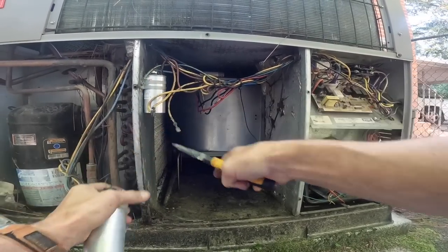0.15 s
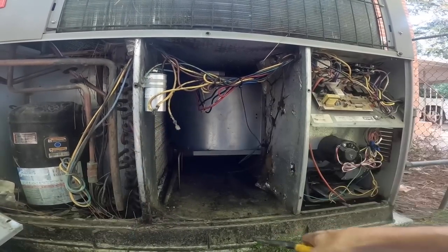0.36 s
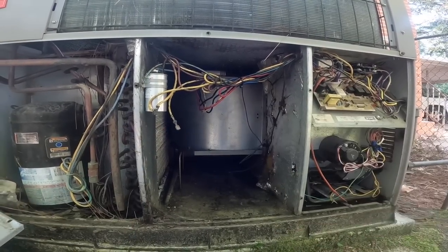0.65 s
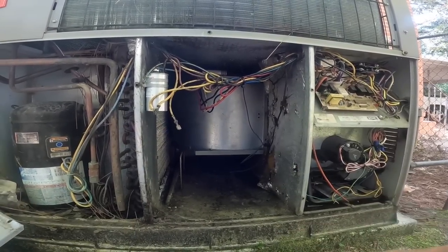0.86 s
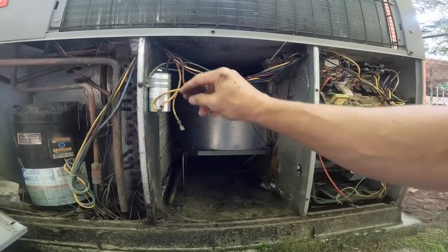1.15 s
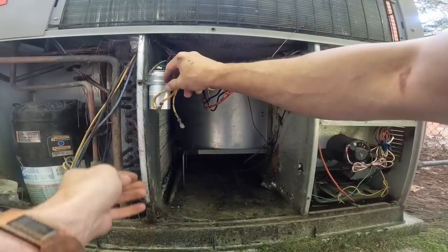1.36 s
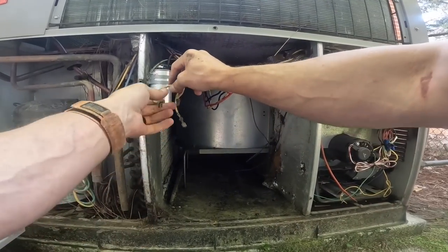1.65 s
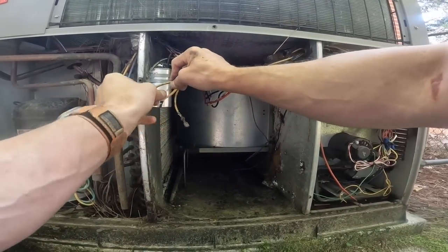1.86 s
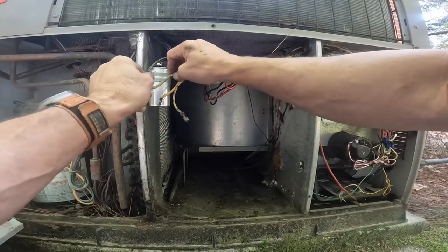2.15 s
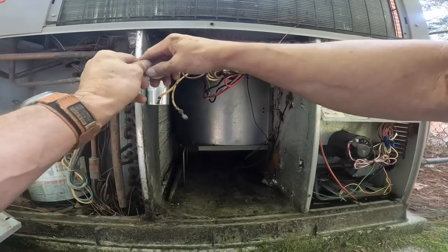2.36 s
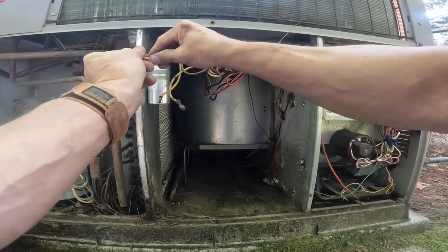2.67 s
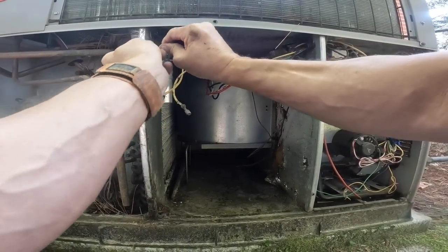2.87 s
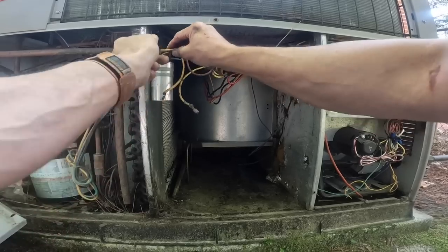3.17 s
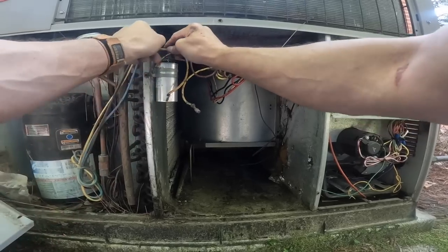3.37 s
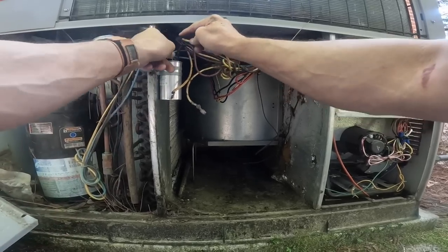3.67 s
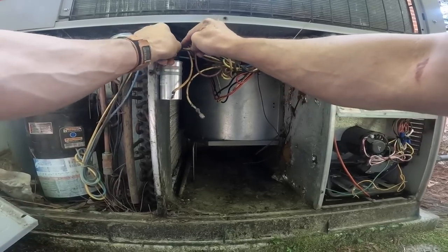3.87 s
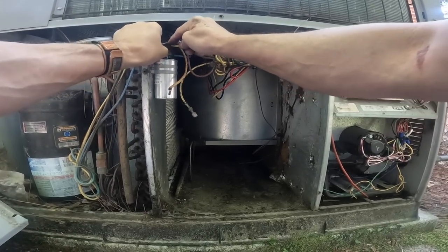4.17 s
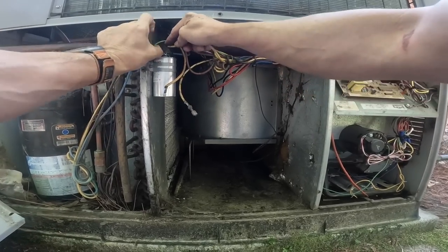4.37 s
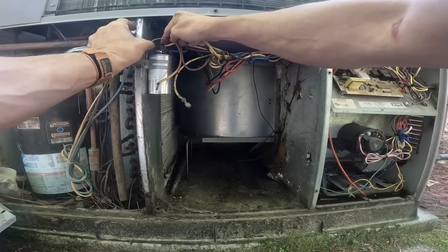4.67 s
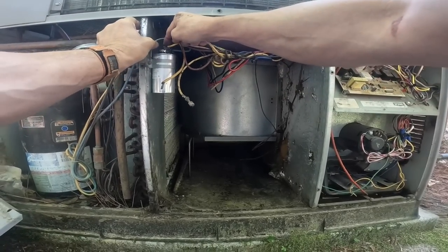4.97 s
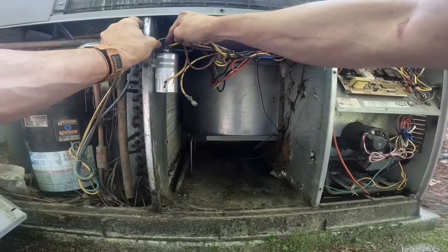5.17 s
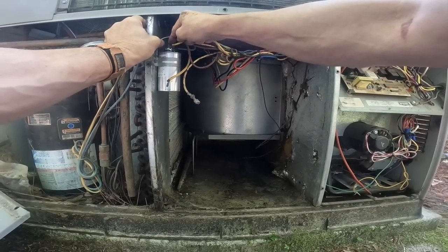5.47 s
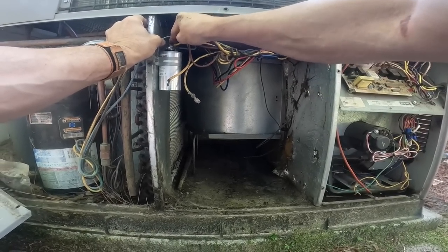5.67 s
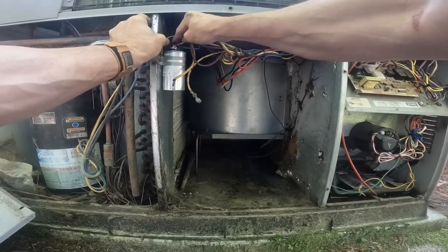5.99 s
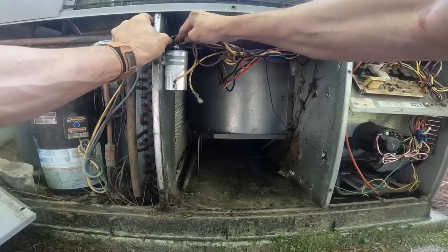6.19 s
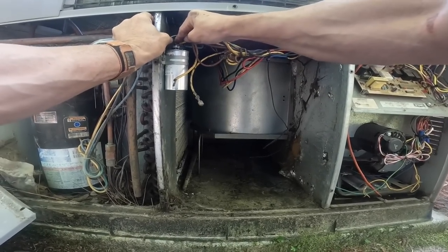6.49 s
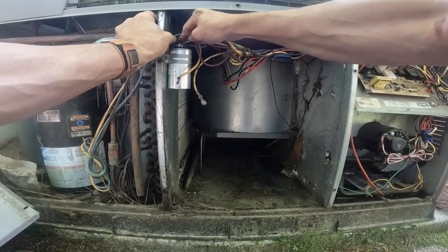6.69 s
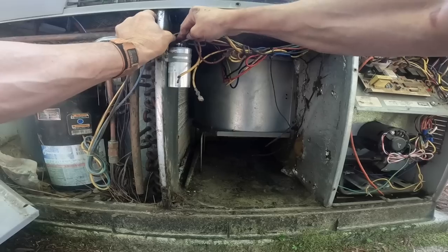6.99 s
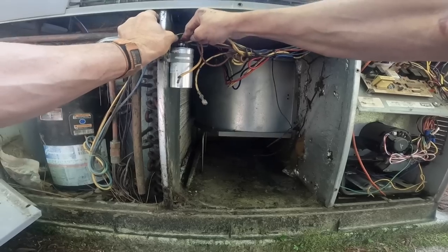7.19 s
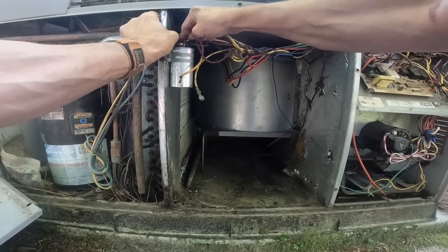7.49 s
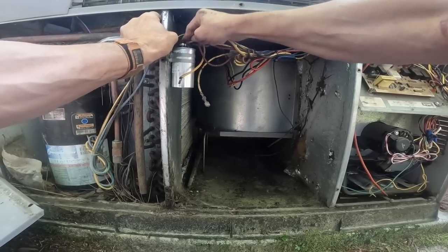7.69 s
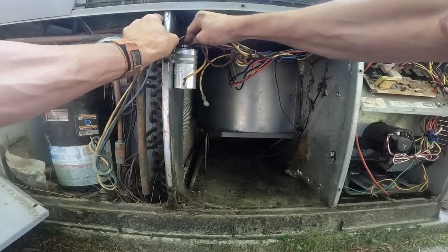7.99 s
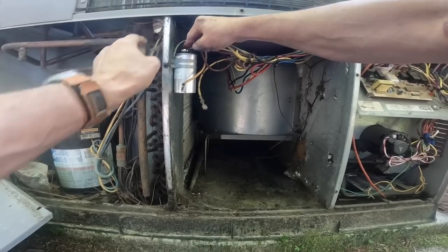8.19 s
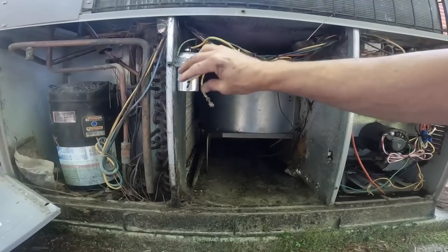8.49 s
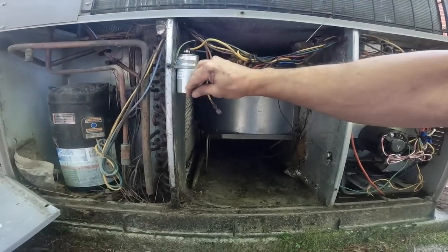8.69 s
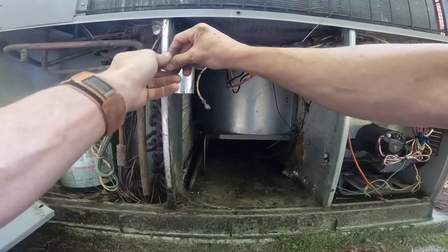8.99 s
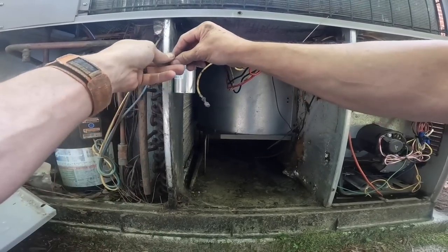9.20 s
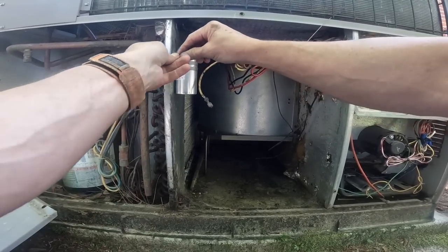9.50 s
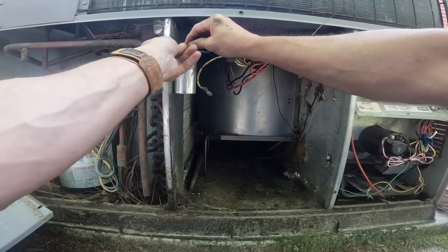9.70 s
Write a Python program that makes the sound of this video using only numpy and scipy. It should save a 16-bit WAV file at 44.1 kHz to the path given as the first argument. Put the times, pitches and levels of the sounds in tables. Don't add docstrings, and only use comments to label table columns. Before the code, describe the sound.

Outdoors at arm's length, hands rustle loose wires with light ticks. Pliers drop early with a hard clank, bounce and thud. Later a metal connector touches a tab, scrapes on quickly, then creaks and clicks in tiny slips while the thin can pings. A neighbouring motor hums, wind bumps the microphone, and birds whistle in far trees.

```python
import sys
import numpy as np
from scipy import signal
from scipy.fft import rfft, irfft, next_fast_len
from scipy.io import wavfile
from scipy.ndimage import uniform_filter1d

SR = 44100
rng = np.random.default_rng(int(sys.argv[2]) if len(sys.argv) > 2 else 0)


def wav_out(sig):
    wavfile.write(sys.argv[1], SR, np.round(np.clip(np.atleast_2d(sig).T, -1, 1) * 32767).astype(np.int16))


def attenuation_scalar(level_db):
    decades = np.asarray(level_db, float) / 20
    return 10 ** decades


N = 434385


def evened(x):
    return x / np.sqrt(np.mean(x ** 2) + 1e-20)


def read(points, hz):
    f, value = np.transpose(points)
    return np.interp(np.log(hz + 1), np.log(f + 1), value)


def curves(rows):
    s, *columns = np.transpose(rows)
    return [np.interp(np.arange(N) / SR, s, column) for column in columns]


def swells(rows, rest_db, rise_db_per_s, fall_db_per_s):
    t = np.arange(0, N, 64) / SR
    s, length, db = np.transpose(rows)[:, :, None]
    rise = rise_db_per_s * np.maximum(s - t, 0)
    fall = fall_db_per_s * np.maximum(t - s - length, 0)
    power = attenuation_scalar(2 * (db - rise - fall)).sum(0)
    return 10 * np.log10(np.interp(np.arange(N) / SR, t, power) + attenuation_scalar(2 * rest_db))


def add(mix, s, sound):
    part = mix[round(s * SR):][:len(sound)]
    part += sound[:len(part)]


def peaked(x, db):
    return attenuation_scalar(db) * x / abs(x).max()


def band(x, hz, width):
    return signal.lfilter(*signal.iirpeak(hz, hz / width, SR), x)


def band_twice(x, hz, width):
    return band(band(x, hz, width), hz, width)


def body(x, modes):
    return sum((-1) ** k * attenuation_scalar(db) * band(x, hz, width) for k, (hz, width, db) in enumerate(modes))


def shaped(x, points):
    size = next_fast_len(N)
    gain = attenuation_scalar(read(points, np.fft.rfftfreq(size, 1 / SR)))
    return irfft(rfft(x, size) * gain, size)[..., :N]


def ports(x, loose):
    decay = attenuation_scalar(-60 * np.arange(900) / SR / 0.18)
    taps = rng.standard_normal((2, 900)) * (rng.random((2, 900)) < 0.05) * decay
    taps = signal.lfilter([1, -1], [1, -0.85], taps)
    taps *= loose / np.linalg.norm(taps, axis=1)[:, None]
    taps[:, 0] += 1
    return signal.oaconvolve(x[None], taps, axes=1)[:, :N]


# pitch_hz, level_db (per Hz)
YARD = [(25, -10), (50, 0), (105, 2), (200, -11.5), (310, -17), (400, -17), (630, -26.5), (800, -30.5),
        (1300, -26.5), (1700, -29.5), (2300, -39), (3800, -51.5), (6500, -47), (12000, -58.5)]
YARD_DB = -43.5
# pitch_hz, likeness (0 to 1)
LIKENESS = [(60, 1), (180, 0.99), (550, 0.89), (1650, 0.42), (4970, 0.28), (15000, 0.64)]
# pitch_hz, lead_rad
LEFT_LEAD = [(0, 0.56), (2500, -0.35), (5860, 0.1), (7410, -0.2), (8790, -0.0), (15200, -0.0)]
# pitch_hz, level_db
LEFT_TILT = [(60, 0.5), (180, -1.5), (550, 2), (1650, 3), (4970, -1), (15000, 13)]


def yard():
    frames, hz = N // 512 + 5, np.fft.rfftfreq(2048, 1 / SR)
    a, b, c, d, patches = rng.standard_normal((frames, 1025, 5)).T
    patches = evened(uniform_filter1d(uniform_filter1d(patches, 16, 0), 12, 1))
    same = np.clip(read(LIKENESS, hz), 0, 1)[:, None]
    left = a + 1j * b
    right = same * left + np.sqrt(1 - same ** 2) * (c + 1j * d)
    right *= (np.exp(-1j * read(LEFT_LEAD, hz)) / attenuation_scalar(read(LEFT_TILT, hz)))[:, None]
    spectra = np.array([left, right]) * attenuation_scalar(read(YARD, hz)[:, None] + 2.0 * patches)
    return attenuation_scalar(YARD_DB) * evened(signal.istft(spectra, nperseg=2048, noverlap=1536)[1][:, :N])


SWELL_DB_PER_S, EBB_DB_PER_S = 48, 58.5
# start_s, length_s, level_db
SURGES = [
    (.3, 0.65, -50),
    (3.5, 0.71, -46),
    (5.15, 0.19, -46.5),
    (6.6, 1.6, -46.5),
    (8.7, 0.39, -37),
    (9.45, 0.1, -32.5),
]
IDLE_DB = -62.5


def motor():
    hum_db = swells(SURGES, IDLE_DB, SWELL_DB_PER_S, EBB_DB_PER_S)
    hum = evened(band(band(rng.standard_normal(N), 118.35, 8.7), 119.7, 3.3))
    buzz = evened(band_twice(rng.standard_normal(N), 233, 4.9))
    return attenuation_scalar(hum_db - 4.5) * hum + attenuation_scalar(-57.5) * buzz


# time_s, level_db
WIND = [(0.0, -39), (0.93, -51), (1.28, -43.5), (1.54, -54), (1.8, -38.5), (2.38, -49.5), (3.18, -36.5),
        (3.5, -45), (4.62, -37.5), (5.57, -53), (6.22, -28), (6.53, -44.5), (7.4, -29), (7.72, -45),
        (8.08, -33.5), (8.67, -37), (9.3, -38), (9.85, -44)]
# start_s, length_s, level_db
GUSTS = [
    (.25, 0.42, -45),
    (3.0, 0.94, -44),
    (5.1, 0.21, -40),
    (5.95, 0.38, -45.5),
    (6.6, 0.82, -46.5),
    (8.05, 0.76, -42),
    (9.2, 0.29, -45),
]
CALM_DB = -51


def wind():
    push_db, = curves(WIND)
    roar_db = swells(GUSTS, CALM_DB, SWELL_DB_PER_S, EBB_DB_PER_S)
    n = rng.standard_normal((6, N))
    push = shaped(n[0] + 0.14 * n[1:3], [(2, -7), (6, 11.5), (14, 7.5), (25, -3.5), (40, -55.5), (120, -130)])
    roar = shaped(n[3] + 0.17 * n[4:], [(18, -49), (28, -10.5), (55, -5.5), (90, -15.5), (300, -110)])
    return attenuation_scalar(push_db) * evened(push) * attenuation_scalar([[-3.5], [2.5]]) + attenuation_scalar(roar_db) * evened(roar)


# start_s, length_s, pitch_hz, width_hz, level_db
GROANS = [
    (1.38, 0.19, 620, 170, -53),
    (8.241, 0.14, 616, 150, -52.5),
    (1.55, 0.5, 755, 51, -66),
    (2.12, 0.18, 100, 9.3, -42.5),
]


def truck():
    out = np.zeros(N)
    for s, length, hz, width, db in GROANS:
        groan = band_twice(rng.standard_normal(round(length * SR)), hz, width)
        add(out, s, attenuation_scalar(db) * evened(groan) * np.hanning(len(groan)))
    return out


OVERTONE_DB = -19


def whistle(notes, shake):
    out = np.zeros(N)
    for s, length, start_hz, end_hz, db in notes:
        hz = np.geomspace(start_hz, end_hz, round(length * SR))
        unsteady = uniform_filter1d(rng.standard_normal((2, SR // 2)), 300)
        waver, flutter = evened(unsteady)[:, :len(hz)]
        turn = 2 * np.pi * np.cumsum(hz * (1 + shake * waver)) / SR
        tone = np.sin(turn) + attenuation_scalar(OVERTONE_DB) * np.sin(2 * turn)
        add(out, s, attenuation_scalar(db + 3.76 * flutter) * tone * signal.windows.tukey(len(hz), 0.5))
    return out


# start_s (within the phrase), length_s, start_hz, end_hz, level_db
PHRASE = [
    (0, 0.0196, 2570, 2836, -60.5),
    (0.018, 0.037, 2870, 2800, -63),
    (.04, .04, 2660, 2403, -67),
    (0.105, 0.025, 5710, 3800, -64.5),
    (0.126, .045, 3350, 3100, -62.5),
    (0.168, 0.027, 3097, 4305, -60.5),
]
# start_s, level_db, high_notes_db
PHRASES = [
    (2.534, -1, 1),
    (2.862, 1, 0),
    (3.222, 1.5, 0.5),
    (3.59, -0.5, 2),
    (8.398, 0.5, -5),
    (8.757, 2, -6),
    (9.108, -2.5, -7),
]
# start_s, length_s, start_hz, end_hz, level_db
FAR_NOTES = [
    (1.1, .04, 1996, 2750, -61),
    (1.145, 0.036, 2580, 2074, -64.5),
    (2.31, 0.024, 3400, 3200, -72),
    (2.335, 0.045, 3200, 4500, -65),
    (2.46, 0.071, 5400, 4700, -73),
    (8.5, .04, 3200, 3400, -72),
    (9.254, .05, 3380, 3280, -61.5),
    (5.34, 0.069, 3700, 4340, -68.5),
    (5.9, 0.052, 3860, 2990, -59.5),
]
HIGH_HZ = 3800
WREN_SHAKE = 0.018
LEAF_BLUR_S = 0.0058


def far_wren():
    notes = list(FAR_NOTES)
    for s, more_db, high_db in PHRASES:
        for delay, length, start_hz, end_hz, db in PHRASE:
            facing_db = high_db * (max(start_hz, end_hz) > HIGH_HZ)
            notes.append((s + delay, length, start_hz, end_hz, db + more_db + facing_db))
    leaves = signal.oaconvolve(rng.standard_normal(N), np.hanning(round(LEAF_BLUR_S * SR)), "same")
    return whistle(notes, WREN_SHAKE) * evened(1.2 + evened(leaves))


# start_s, length_s, start_hz, end_hz, level_db
WHISTLES = [(0.335, 0.054, 4650, 4900, -66), (.375, .045, 4940, 4900, -59), (.375, 0.049, 6150, 6160, -72),
            (.44, .11, 2780, 2680, -67), (3.78, 0.094, 5970, 5950, -76), (3.91, 0.055, 5730, 5700, -69),
            (1.37, .08, 6750, 6750, -77), (6.71, 0.034, 4127, 4030, -71), (6.652, .04, 5150, 5240, -74),
            (.35, .035, 3580, 3660, -66), (0.37, 0.17, 3070, 3100, -69), (.76, 0.024, 4000, 4550, -65),
            (0.786, 0.034, 2980, 3090, -60), (.815, 0.028, 3270, 3030, -63), (.95, .15, 3544, 3420, -66),
            (1.285, 0.0246, 3350, 4600, -68), (1.31, 0.048, 4620, 4610, -64), (1.33, 0.03, 4310, 3790, -65),
            (5.315, 0.021, 3710, 3924, -65.5), (5.33, 0.046, 4180, 4140, -72),
            (5.39, 0.027, 4450, 4420, -67), (3.14, .09, 5030, 4970, -71), (5.857, 0.071, 3930, 3640, -57.5),
            (5.975, 0.055, 2846, 2710, -56), (9.355, 0.069, 5540, 5400, -64.5),
            (9.398, 0.062, 5350, 4500, -59), (9.44, 0.066, 4480, 4320, -61), (9.54, 0.11, 4500, 4380, -77),
            (9.4, 0.12, 3180, 3080, -64.5)]
NEAR_SHAKE = 0.009


def high_whistler():
    flicker = evened(uniform_filter1d(rng.standard_normal(N), 500))
    return whistle(WHISTLES, NEAR_SHAKE) * evened(1.9 + flicker)


# start_s, length_s, start_hz, end_hz, level_db
CHIRPS = [(.27, 0.036, 2510, 2700, -63.5), (1.48, 0.063, 2680, 2520, -67), (4.54, 0.015, 2497, 2550, -61),
          (4.557, 0.022, 2200, 2170, -66), (4.577, .025, 2150, 2110, -64.5), (4.78, 0.015, 2050, 2300, -67),
          (4.8, 0.035, 2080, 2070, -64), (4.862, 0.015, 2520, 2550, -58.5), (4.88, .045, 2150, 2090, -58),
          (5.6, 0.039, 2800, 2780, -70), (5.775, .04, 2260, 2460, -55), (5.84, .025, 2150, 2250, -64),
          (5.868, .03, 2490, 2580, -66), (9.36, .03, 2600, 2770, -69), (9.39, 0.08, 2790, 2200, -66)]


def low_chirper():
    return whistle(CHIRPS, NEAR_SHAKE)


def trees():
    wren, near, chirps = far_wren(), high_whistler() + truck(), low_chirper()
    tail = rng.standard_normal((2, SR)) * attenuation_scalar(-60 * np.arange(SR) / SR / 0.68)
    tail = tail + 0.46 * tail[::-1]
    tail = tail / np.linalg.norm(tail[0])
    sent = attenuation_scalar(2) * wren + attenuation_scalar(-1.5) * near + attenuation_scalar(-7.5) * chirps
    echoes = signal.fftconvolve(sent[None], tail, axes=1)[:, :N]
    direct = attenuation_scalar(-3) * near + chirps + attenuation_scalar(-9) * wren
    return direct * attenuation_scalar([[1.1], [-1.1]]) + echoes


# pitch_hz, level_db, t60_s
PLIERS = [(344, -7, 0.11), (592, -15, 0.031), (930, -4, 0.043), (1290, -0.5, 0.018), (1622, -7, 0.013),
          (2430, -13, 0.028), (3320, -5, 0.022), (4650, 2, 0.015), (5220, 3.5, 0.009), (5960, -16, 0.02),
          (7400, -20.5, 0.037), (9500, -17.5, .02)]
# start_s, level_db
DROP = [(.912, -48), (0.9228, -19), (0.9224, -21), (.9245, -10), (0.924, -26), (0.929, -27.5), (0.936, -38),
        (0.945, -40), (0.955, -45), (.99, -46), (1.004, -43.5)]
SETTLE_DB, SETTLE_T60_S = -43.5, 0.25


def pliers():
    out, t = np.zeros(N), np.arange(9000) / SR
    for s, db in DROP:
        ring = np.zeros(9000)
        for (hz, mode_db, t60), luck in zip(PLIERS, rng.random(len(PLIERS))):
            mode_db = mode_db + 8.7 * (luck - 0.5)
            ring -= attenuation_scalar(mode_db - 60 * t / t60) * np.sin(2 * np.pi * hz * t)
        crack = 0.55 * rng.standard_normal(9000) * attenuation_scalar(-60 * t / 0.01)
        add(out, s, attenuation_scalar(db) * (0.3 * ring + band_twice(crack, 4000, 10000)))
    add(out, 0.917, attenuation_scalar(-24.5) * np.hanning(190))
    thud = evened(band(rng.standard_normal(9000), 330, 440))
    add(out, DROP[1][0], attenuation_scalar(-24 - 60 * t / 0.087) * thud)
    hiss = band(rng.standard_normal(9000), 2200, 5000)
    add(out, DROP[3][0], hiss * attenuation_scalar(SETTLE_DB - 60 * t / SETTLE_T60_S))
    return ports(out, 0.22) * attenuation_scalar([[-1.1], [1.1]])


CONTACT_S = 3.9
# pitch_hz, width_hz, level_db
CAN = [(265, 19, 11), (408, 52.5, 7), (630, 105, -0.5), (969, 115, -4), (1379, 213, -6.5),
       (1656, 207, -3.5)]
# pitch_hz, width_hz, level_db
TERMINAL = [(1667, 272, -0.5), (2700, 68, -14), (3550, 230, 6.5), (5180, 220, -6), (7010, 120, 4),
            (7200, 81, 4), (9700, 510, -7)]
# pitch_hz, level_db (per Hz)
RUSTLE_TONE = [(900, -33), (2000, 0), (3500, -0.5), (5200, -2.5), (7800, -4.5), (13000, -19)]
# start_s, length_s, rustle_db,
# can_pressure_db (against the rustle)
STROKES = [(0.178, 0.19, -70.5, 1), (0.36, 0.061, -68.5, 6.5), (0.784, 0.085, -69, 1),
           (0.928, 0.068, -56, 3.5), (1.326, 0.27, -69, 7), (2.257, 0.012, -67, 8),
           (2.426, 0.058, -72.5, -16), (2.86, 0.061, -70, 8), (2.94, 0.33, -69.5, 4),
           (3.398, 0.56, -76, 10.5), (3.95, .1, -68, 9), (4.129, 0.043, -58, 8.5), (4.363, 0.066, -66, 7),
           (4.642, 0.085, -59, 5), (4.866, 0.22, -62.5, -5), (5.102, 0.25, -68, -15),
           (5.683, 0.32, -69.5, 5), (6.162, 0.14, -68.5, 10), (6.356, 0.31, -76.5, 16),
           (6.881, .07, -68, 11.5), (7.097, 0.14, -75.5, 13.5), (7.327, 0.089, -64.5, 8.5),
           (7.45, 0.054, -69, 9), (7.615, 0.054, -64.5, 11), (7.075, 0.022, -79, 14),
           (7.23, 0.019, -71.5, 12), (6.608, .08, -74.5, 11), (0.99, 0.012, -61, 0.5),
           (7.82, 0.082, -60, 6.5), (8.005, 0.066, -63.5, 4.5), (8.117, 0.075, -52.5, 0.5),
           (8.2, .05, -65, 5), (8.302, 0.41, -68.5, 2), (9.003, 0.18, -69.5, 3), (9.276, 0.059, -61, -2),
           (9.55, 0.5, -72.5, 9)]
GRIP_DB_PER_S, LET_GO_DB_PER_S = 400, 270
REST_DB, HOLD_DB, HOLD_PRESS_DB = -90.5, -75, 12


def rustle():
    held = np.arange(N) / SR > CONTACT_S
    rest_db = np.where(held, HOLD_DB, REST_DB)
    edge_rows = [(s, length, db) for s, length, db, _ in STROKES]
    can_rows = [(s, length, db + press_db) for s, length, db, press_db in STROKES]
    edge_db = swells(edge_rows, rest_db, GRIP_DB_PER_S, LET_GO_DB_PER_S)
    can_db = swells(can_rows, rest_db + HOLD_PRESS_DB * held, GRIP_DB_PER_S, LET_GO_DB_PER_S)
    tiny_slips = attenuation_scalar(2.9 * np.minimum(rng.exponential(1, N), 5)) * (rng.random(N) < 900 / SR)
    grit = np.sqrt(signal.lfilter([1], [1, -0.99], tiny_slips ** 2) + 1.8)
    n = grit * rng.standard_normal((6, N))
    edge = evened(shaped(n[0] + 0.43 * n[2:4], RUSTLE_TONE))
    can = evened(band(body(n[1] + 0.29 * n[4:], CAN + TERMINAL[:2]), 1200, 3300))
    return attenuation_scalar(edge_db + 0.5) * edge + attenuation_scalar(can_db + 1.5) * can


# start_s, level_db, pitch_hz
KNOCKS = [(0.4237, -44, 910), (0.4711, -36.5, 1030), (4.203, -47.5, 1580), (1.656, -45.5, 1020),
          (3.953, -28.5, 310), (4.01, -33, 350), (4.107, -42.5, 1520), (6.807, -42.5, 1250),
          (6.812, -36.5, 810), (7.839, -42, 306), (7.888, -35, 283)]


def knocks(out):
    t = np.arange(4000) / SR
    for s, db, hz in KNOCKS:
        burst = rng.standard_normal(4000) * attenuation_scalar(-60 * t * np.sqrt(hz) / 1.9)
        struck = 0.5 * body(burst, CAN) + band(burst, hz, 0.2 * hz) + 0.11 * burst
        add(out, s, peaked(band_twice(struck, hz, 2 * hz), db))


# start_s, level_db, pitch_hz
PINGS = [(4.262, -46.5, 1640), (4.759, -55, 1670), (6.507, -61, 1670), (5.1988, -42, 1680),
         (6.364, -44.5, 1720), (7.083, -50, 1680), (7.245, -46, 1640), (7.61, -53, 1670),
         (8.047, -40, 1590), (8.073, -37.5, 1610), (8.112, -46, 1560), (8.12, -44, 1720),
         (8.127, -38.5, 1590), (8.168, -41, 1700), (8.174, -42, 2700), (8.183, -41, 1570)]


def pings(out):
    t = np.arange(4000) / SR
    for s, db, hz in PINGS:
        burst = rng.standard_normal(4000) * attenuation_scalar(-60 * t / 0.018)
        wall = body(burst, [(hz, 120, 0), (2150, 400, -13)])
        add(out, s, peaked(band(wall, hz, 2 * hz), db))


# start_s, level_db, length_s
THUMPS = [
    (.4247, -38, 0.00091),
    (.4724, -33, 0.0015),
    (.529, -42, 0.0012),
    (4.1075, -52, .0005),
    (6.8085, -37, 0.0011),
    (6.8095, -36, 0.0033),
    (3.956, -36, 0.0028),
    (4.611, -38, .0007),
    (7.161, -46, 0.00057),
]


def thumps(out):
    for s, db, length in THUMPS:
        swing = np.linspace(0, 1, round(length * SR))
        add(out, s, -attenuation_scalar(db) * np.sin(np.pi * swing) * np.sin(3 * np.pi * swing))


# start_s, snap_db, pitch_hz
TICKS = [(0.025, -50.5, 4280), (0.0922, -56, 3020), (0.1048, -41.5, 4100), (0.1145, -31.5, 3300),
         (0.226, -51, 6000), (0.2897, -50, 6000), (0.4114, -40.5, 4860), (0.4233, -42, 3090),
         (0.4713, -43.5, 4100), (0.527, -49.5, 1310), (0.79, -54, 7970), (2.8692, -49, 6300),
         (2.89, -40.5, 6000), (2.902, -44.5, 5780), (3.0136, -58, 7340), (3.599, -55, 8500),
         (3.98, -51, 4220), (6.043, -52, 10550), (6.355, -59, 9000), (6.872, -62, 6000), (7.68, -51, 11000),
         (8.21, -58, 11000), (8.235, -65, 9500), (2.934, -55, 6500), (2.9775, -62, 7000),
         (3.0435, -58, 7500), (3.49, -57, 5800), (3.655, -55, 6000), (2.43, -58, 6960), (2.452, -57, 6490),
         (6.8085, -56.5, 7200), (6.8832, -36.5, 6460), (7.014, -59, 7000), (7.132, -64, 9500),
         (7.228, -58, 9500), (7.891, -48, 10500), (8.2755, -40, 6170), (8.285, -56, 12600),
         (8.5964, -50, 6500)]
# start_s, snap_db, can_knock_db
ROOT_SLIPS = [(3.955, -44, -37.5), (4.029, -45, -48), (4.3635, -52, -55), (4.387, -48.5, -63),
              (4.9066, -44, -43.5), (4.999, -44, -54), (5.326, -50, -70), (6.3623, -52, -46),
              (6.5209, -49, -45.5), (6.9945, -54.5, -65), (7.262, -49.5, -52), (7.3288, -53, -55),
              (7.3447, -44, -49), (7.366, -47, -50), (7.3874, -43, -45), (7.407, -43, -51),
              (7.43, -41.5, -46.5), (7.4637, -39, -44), (7.5568, -53, -47.5), (7.646, -50, -47),
              (7.799, -56, -51), (7.825, -40.5, -44.5), (7.866, -44.5, -50), (7.8907, -48, -50),
              (7.94, -46.5, -56), (8.071, -43, -53)]
# start_s, snap_db
SPADE_SLIPS = [(4.013, -45), (4.26, -53.5), (4.294, -56), (4.761, -50), (6.407, -59), (4.8256, -50),
               (4.861, -50), (4.933, -48), (5.232, -46.5), (5.618, -52.5), (6.574, -50.5), (6.654, -53),
               (8.0446, -52), (8.8214, -48), (9.0379, -50)]
# start_s, snap_db
TIP_SLIPS = [(4.1066, -63), (4.164, -40), (6.173, -47.5), (6.2072, -39.5), (6.2218, -42.5), (6.244, -40),
             (6.2598, -41), (6.859, -47), (7.158, -51), (7.2482, -52), (7.482, -43.5), (7.495, -42),
             (7.6892, -48.5), (8.115, -51)]
TICK_KNOCK_DB, SPADE_KNOCK_DB, TIP_KNOCK_DB = -21, -5, -3.5
ROOT_HZ, SPADE_HZ, TIP_HZ = 3700, 6000, 7750
TIP_BODY_HZ = 5400


def slips():
    ticks = [(s, db, hz, db + TICK_KNOCK_DB) for s, db, hz in TICKS]
    roots = [(s, db, ROOT_HZ, knock_db) for s, db, knock_db in ROOT_SLIPS]
    spades = [(s, db, SPADE_HZ, db + SPADE_KNOCK_DB) for s, db in SPADE_SLIPS]
    tips = [(s, db, TIP_HZ, db + TIP_KNOCK_DB) for s, db in TIP_SLIPS]
    return ticks + roots + spades + tips


def snaps(out):
    t = np.arange(4000) / SR
    decay = attenuation_scalar(-60 * t / 0.012) + 0.13 * attenuation_scalar(-60 * t / 0.077)
    attack = np.minimum(t / 0.001, 1)
    for s, db, hz, knock_db in slips():
        snap_burst, knock_burst = rng.standard_normal((2, 4000)) * decay * attack
        modes = TERMINAL[3:] if hz == SPADE_HZ else TERMINAL[1:]
        tip_gain = 6.0 if hz == TIP_HZ else 1.3
        ring = body(snap_burst, modes) + tip_gain * band(snap_burst, TIP_HZ, 230)
        hz = TIP_BODY_HZ if hz == TIP_HZ else hz
        snap = 0.74 * (s > CONTACT_S) * ring + 0.09 * band(snap_burst, 12100, 4500)
        snap = snap + band_twice(snap_burst, hz, 0.77 * hz)
        add(out, s, peaked(snap, db) + peaked(body(knock_burst, CAN), knock_db + 6))


def handwork():
    out = np.zeros(N)
    for play in (snaps, knocks, pings, thumps):
        play(out)
    return ports(out, 0.47)


# time_s, body_db, edge_db
SLIDE = [
    (4.607, -73, -79),
    (4.611, -41, -55),
    (4.63, -42, -48.5),
    (4.652, -44, -51),
    (4.662, -45.5, -51.5),
    (4.7, -62, -64),
]
# start_s, level_db, pitch_hz
CATCHES = [
    (4.611, -40, 1530),
    (4.6275, -28, 1710),
    (4.616, -35.5, 2790),
    (4.6375, -36, 1500),
    (4.6415, -33.5, 1900),
    (4.639, -41, 6150),
    (4.645, -45, 6700),
    (4.651, -33, 1750),
    (3.7, -52, 1290),
]


def slide():
    before = (SLIDE[0][0] - 0.002, -120, -120)
    after = (SLIDE[-1][0] + 0.011, -120, -120)
    body_db, edge_db = curves([before] + SLIDE + [after])
    jerks = signal.lfilter([1], [1, -0.98], rng.random(N) < 300 / SR)
    scrape = rng.standard_normal(N) * np.sqrt(0.097 + jerks)
    low_modes = [(1720, 230, 3), (1250, 900, -2.5), (2300, 320, -3.5), (2800, 360, -4)]
    low = attenuation_scalar(body_db - 2.5) * evened(body(scrape, low_modes))
    t = np.arange(900) / SR
    for s, db, hz in CATCHES:
        attack = np.minimum(t / 0.00092, 1)
        add(low, s, attenuation_scalar(db - 60 * t / 0.02) * attack * np.sin(2 * np.pi * hz * t))
    edge = body(scrape, [(4100, 350, -1), (6530, 740, 1), (9300, 820, -11.5)])
    edge = evened(edge + 0.4 * band(scrape, 4200, 6000))
    return ports(low + attenuation_scalar(edge_db) * edge, 0.61)


# pitch_hz, lead_rad
PORT_LEAD = [(300, 0), (1300, 0.31), (3000, 0.74), (5500, 0.13), (8000, 0.26), (10500, 0), (13000, .9)]
# pitch_hz, level_db
PORT_SHADE = [(5000, -0.5), (8000, -1), (11000, -2.5), (14000, 1)]


def housing(x):
    size = next_fast_len(N)
    hz = np.fft.rfftfreq(size, 1 / SR)
    path = np.exp(1j * read(PORT_LEAD, hz)) * attenuation_scalar(read(PORT_SHADE, hz))
    return np.array([x[0], irfft(rfft(x[1], size) * path, size)[:N]])


def scene():
    return yard() + motor() + wind() + housing(trees() + pliers() + rustle() + handwork() + slide())


def band_limit(x):
    return signal.sosfilt(signal.butter(12, 15620, fs=SR, output="sos"), x)


# pitch_hz, level_db
MIC = [(8500, 1), (11000, -0.5), (13500, -3.5), (15000, -18.5), (15800, -35)]


def record(dry):
    mix = shaped(dry, MIC)
    return band_limit(mix)


dry = scene()
out = record(dry)
wav_out(out)
```